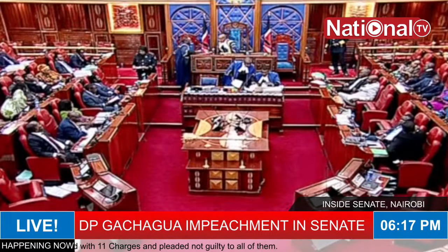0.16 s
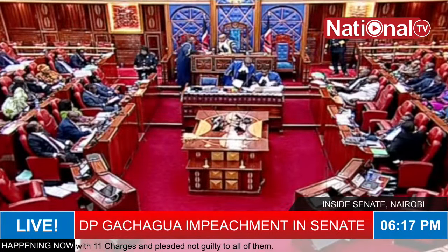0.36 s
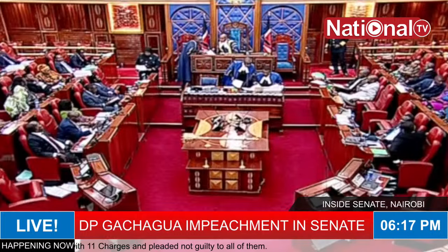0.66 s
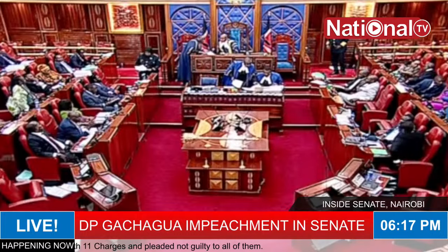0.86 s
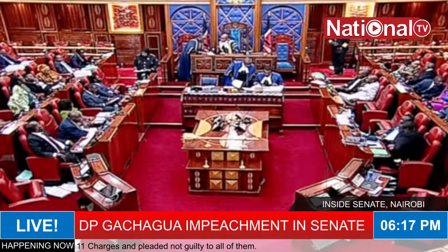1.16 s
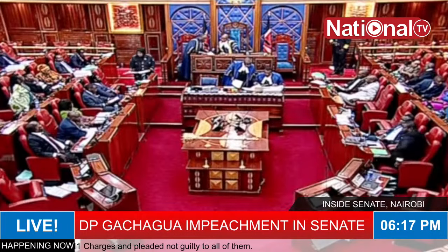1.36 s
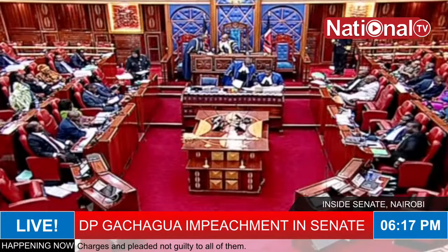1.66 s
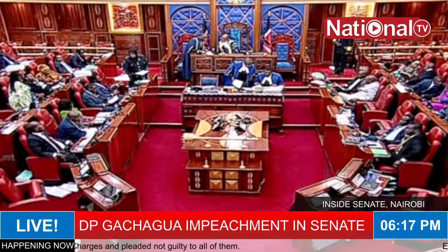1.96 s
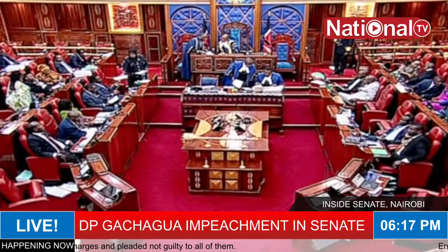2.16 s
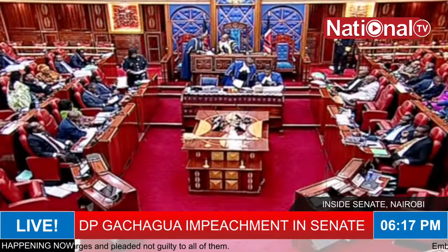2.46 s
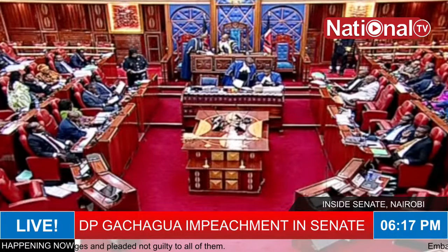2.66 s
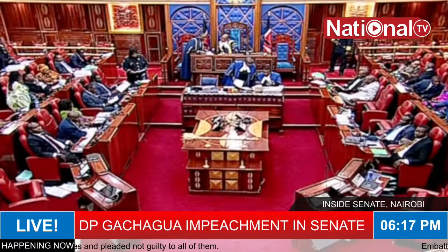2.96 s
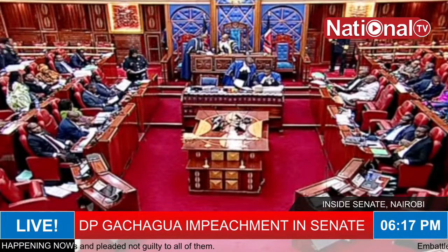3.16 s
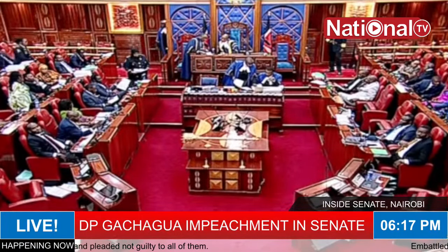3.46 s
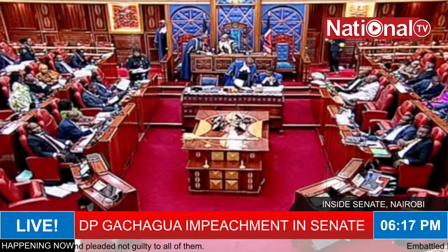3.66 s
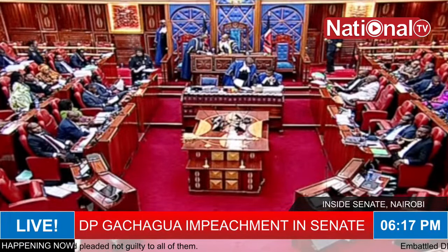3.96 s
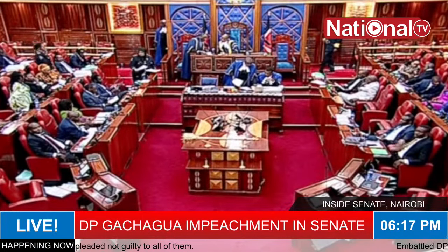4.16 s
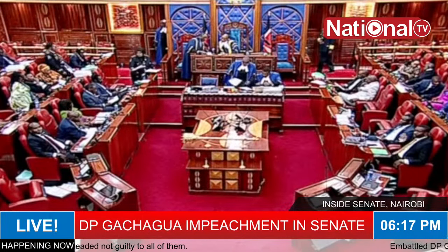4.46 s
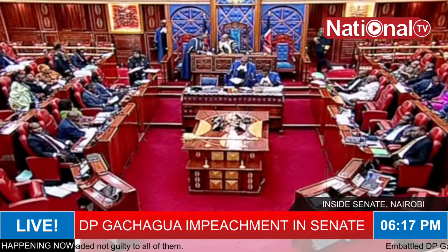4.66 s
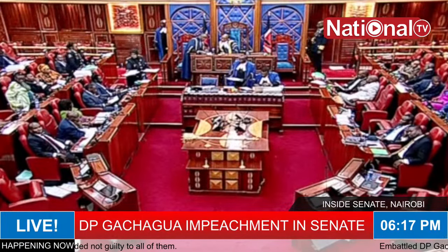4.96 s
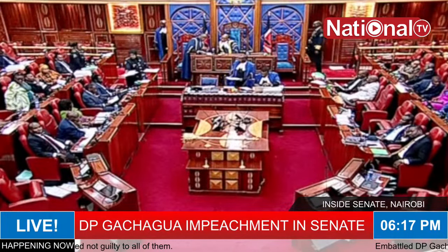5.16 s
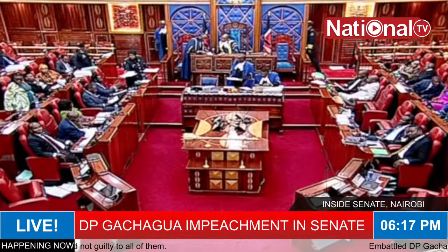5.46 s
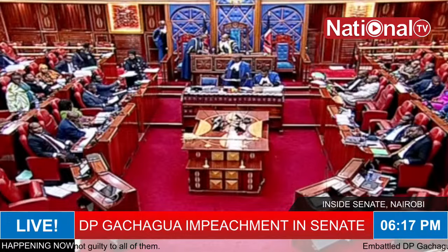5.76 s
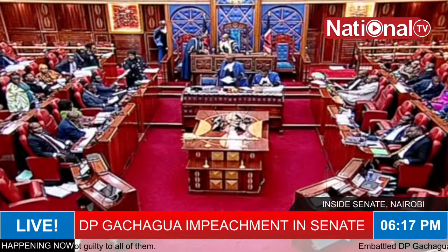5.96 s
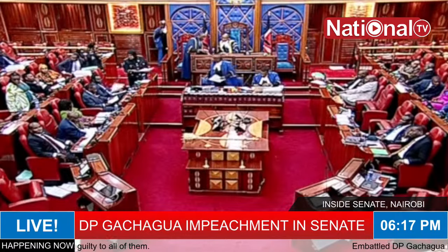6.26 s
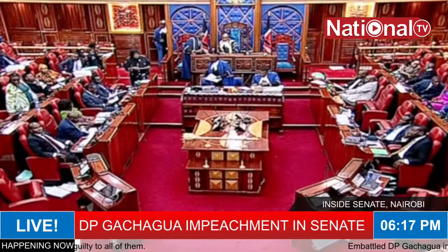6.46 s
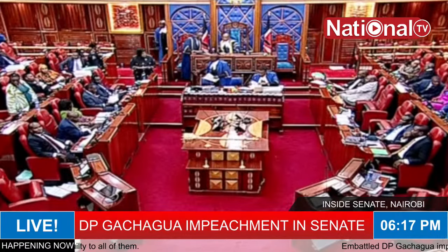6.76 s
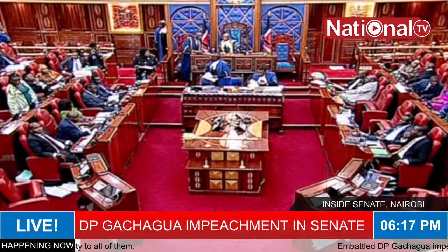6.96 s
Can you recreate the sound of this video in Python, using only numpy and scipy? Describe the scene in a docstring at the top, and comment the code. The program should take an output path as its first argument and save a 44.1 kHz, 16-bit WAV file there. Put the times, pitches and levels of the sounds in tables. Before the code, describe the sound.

Mains hum drones unchanged on an idle audio line, with a faint, gently throbbing high whine above it.

```python
"""Interference on an idle line

A low mains hum, rich in odd harmonics, carries the fine buzz of rectifier spikes. High above it two
switching converters whine at nearly the same pitch and beat against each other. Faint whines, thin
whistles and a slowly swelling low pair of tones sit in a bed of circuit hiss. All of it is mono."""
import sys
import numpy as np
from scipy import signal
from scipy.fft import rfft, irfft
from scipy.io import wavfile

SR = 44100
rng = np.random.default_rng(int(sys.argv[2]) if len(sys.argv) > 2 else 0)


def log_audio(samples):
    """Write samples as a 16-bit WAV file to the path given in sys.argv[1]."""
    # one column per channel
    frames = np.atleast_2d(samples).T
    # limit to full scale, then quantise
    limited = np.clip(frames, -1, 1)
    pcm = np.round(limited * 32767).astype(np.int16)
    wavfile.write(sys.argv[1], SR, pcm)


N = 313110
T = np.arange(N) / SR


def gain_of(db):
    """Decibels to amplitude."""
    return 10 ** (np.asarray(db) / 20)


def shaped_noise(density):
    """Noise whose power per Hz follows density(hz)."""
    hz = np.fft.rfftfreq(N, 1 / SR)
    return irfft(rfft(rng.standard_normal(N)) * np.sqrt(density(hz) * SR / 2), N)


def bell(hz, centre, width):
    """Smooth peak of unit area."""
    return np.exp(-.5 * ((hz - centre) / width) ** 2) / (width * np.sqrt(2 * np.pi))


def comb(carrier, mains, rows, lag, spread):
    """Sines at the carrier plus multiples of the mains; lag and spread (rad) stagger their phases."""
    return sum(gain_of(db) * np.sqrt(2) * np.cos(carrier + k * (mains + lag) + spread * k ** 2)
               for k, db in rows)


# The drift of the power grid. Each row: time in seconds, frequency in Hz.
MAINS_DRIFT = [(0, 49.616), (1.2, 49.6067), (2.4, 49.6069), (3.6, 49.6123), (4.8, 49.6199), (6, 49.6287),
               (7.1, 49.6385)]

def mains_phase():
    """Running phase of the slowly drifting mains, in radians."""
    hz = np.interp(T, *np.transpose(MAINS_DRIFT))
    return 2 * np.pi * np.cumsum(hz) / SR


# The colour of the noise bed. Each row: frequency in Hz, power per Hz in dB.
HISS_SPECTRUM = [(10, -110), (40, -99), (85, -101), (130, -95), (165, -96), (210, -102), (400, -101),
                 (700, -96.5), (1200, -93), (1600, -95), (2100, -100), (3000, -105), (4500, -108),
                 (7000, -110), (11000, -111), (16000, -111)]

def circuit_hiss(mains, puff_db=1.6, sharpness=12):
    """Smooth amplifier noise that puffs up briefly at each rectifier spike."""
    knots_hz, db = np.transpose(HISS_SPECTRUM)
    bed = shaped_noise(lambda hz: gain_of(np.interp(np.log(hz + 1), np.log(knots_hz + 1), db)) ** 2)
    puffs = sum(np.exp(sharpness * (np.cos(2 * (mains - 2 * np.pi * place)) - 1)) for place, _ in SPIKES)
    return gain_of(puff_db * (puffs - puffs.mean())) * bed


# Thin tones from sub-bass to top treble. Each row: pitch in Hz, rms wander in Hz, level in dB.
WHISTLES = [(28, 2, -87.5), (326, .8, -85.5), (429.5, 1, -88), (2036, 3, -80), (2912, 3, -83.5),
            (3110, 2.5, -87.5), (3220, 3, -91), (10215, 3, -100), (12700, 2.5, -96), (13116, 2.8, -94.5),
            (15312, 1.5, -98)]

def whistles():
    """Pure tones, steady in level, each wandering a little about its pitch."""
    out = np.zeros(N)
    for hz, wander_hz, db in WHISTLES:
        drift = shaped_noise(lambda f: 2 * bell(f, 0, 1.49))
        phase = 2 * np.pi * np.cumsum(hz + wander_hz * drift) / SR
        out += gain_of(db) * np.sqrt(2) * np.sin(phase)
    return out


# Two close low tones. Each entry: level in dB, lower tone first.
LOW_PAIR_DB = [-78.5, -80.5]

def low_pair(pitches_hz=(97.47, 98.06), peak_s=.85):
    """Two tones beat slowly, swelling as they fall into step."""
    return sum(gain_of(db) * np.sqrt(2) * np.cos(2 * np.pi * hz * (T - peak_s))
               for hz, db in zip(pitches_hz, LOW_PAIR_DB))


# Midrange whines. Each row: pitch in Hz, phase swing in radians, level in dB before
# ring modulation, 1 if the mains ring-modulates the whine or 0 if not.
FAINT_WHINES = [(2289.79, 1.7, -75, 1), (2184.17, 1.2, -82.5, 0), (2613.43, 1.5, -84.5, 0)]

def faint_whines(mains):
    """Weak, buzzy tones whose phase swings twice each mains cycle."""
    out = np.zeros(N)
    for hz, swing, db, ring in FAINT_WHINES:
        phase = 2 * np.pi * (hz * T + rng.random()) + swing * np.cos(2 * mains)
        out += gain_of(db) * np.sqrt(2) * np.cos(ring * mains) * np.cos(phase)
    return out


# The rectifier buzz. Each row: place as a share of the mains cycle, level of the lowest harmonic in dB.
SPIKES = [(.311, -88), (.417, -86), (.6, -95)]

def rectifier_spikes(mains, lowest=33, db_per_octave=-12):
    """High odd harmonics line up into a spike every half cycle, alternating in sign."""
    harmonics = [(k, db_per_octave * np.log2(k / lowest)) for k in range(lowest, 100, 2)]
    return sum(gain_of(db) * comb(0, mains, harmonics, lag=-2 * np.pi * place, spread=0)
               for place, db in SPIKES)


# The two converter whines, one list of sidebands for each switching harmonic.
# Each row: offset in multiples of the mains, level in dB at full swell.
LOWER_WHINE = [
    [(-22, -92), (-12, -90), (-10, -90), (-8, -89), (-6, -81.7), (-4, -76.5), (-2, -79), (0, -69.6),
     (2, -78.8), (4, -87.3), (10, -92), (14, -94.5), (16, -89.5), (18, -93.5)],
    [(-5, -94), (1, -71.4)],
    [(0, -77)],
]
UPPER_WHINE = [
    [(0, -70)],
    [(-5, -95), (-1, -98), (1, -72.9), (3, -96.5)],
    [(0, -76.5)],
]

def converter(mains, harmonics, switching_hz, twin_rad, twin_at_s, slide_rad_per_s=.045, in_step_s=.0543):
    """Twin switching units slide slowly in phase: they add or cancel, faster in higher harmonics."""
    twin_angle = twin_rad + slide_rad_per_s * (T - twin_at_s)
    out = np.zeros(N)
    for order, sidebands in enumerate(harmonics, 1):
        carrier = 2 * np.pi * order * switching_hz * (T - in_step_s)
        out += np.cos(order * twin_angle) * comb(carrier, mains, sidebands, lag=-.608, spread=.4734)
    return out


# The body of the hum. Each row: multiple of the mains, level in dB.
HUM_HARMONICS = [(1, -59.6), (3, -51.1), (5, -63.3), (7, -68.7), (9, -70.6), (11, -76.0), (13, -81.3),
                 (15, -69.9), (19, -73.7), (21, -84.9), (23, -85.4), (25, -81.3), (27, -78.8), (29, -82.0),
                 (31, -78.9)]

def mains_hum(mains, waver_depth=.032):
    """Odd harmonics of distorted line current, with a slight, fast waver in level."""
    waver = shaped_noise(lambda hz: bell(hz, 10, 8.4))
    stack = comb(2.308, mains, HUM_HARMONICS, lag=-.154, spread=.1615)
    return stack * (1 + waver_depth * waver)


def scene():
    """Hum, buzz, whines and hiss share one line, the same on both channels."""
    mains = mains_phase()
    line = mains_hum(mains) + rectifier_spikes(mains)
    # Switching rates 2.5 Hz apart make the high whine throb.
    line += converter(mains, LOWER_WHINE, switching_hz=5002.46, twin_rad=np.pi / 6, twin_at_s=4.9)
    line += converter(mains, UPPER_WHINE, switching_hz=5004.968, twin_rad=np.pi / 2, twin_at_s=3.2)
    line += faint_whines(mains) + low_pair() + whistles() + circuit_hiss(mains)
    return np.array([line, line])


def record(dry, cutoff_hz=15340):
    """A steep low-pass trims the very top of the treble."""
    low_pass = signal.firwin(1201, cutoff_hz, window=("kaiser", 8), fs=SR)
    return signal.oaconvolve(dry, low_pass[None], "same")


dry = scene()
out = record(dry)
log_audio(out)
```